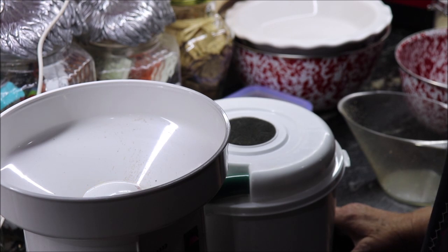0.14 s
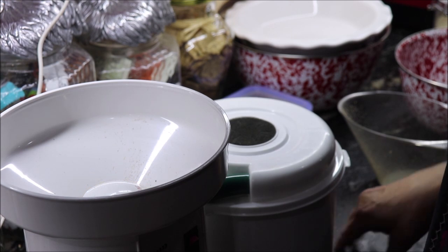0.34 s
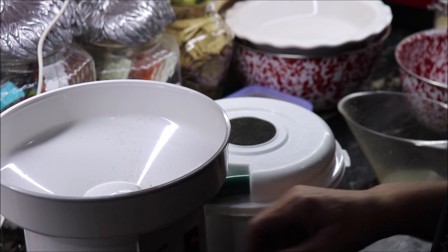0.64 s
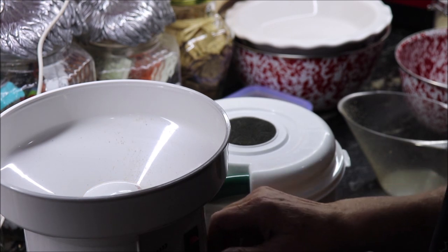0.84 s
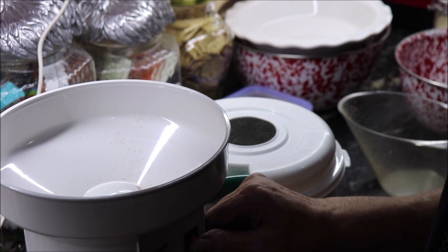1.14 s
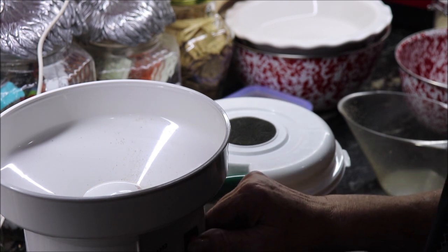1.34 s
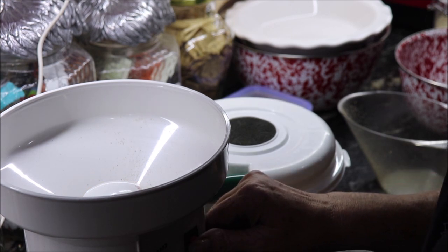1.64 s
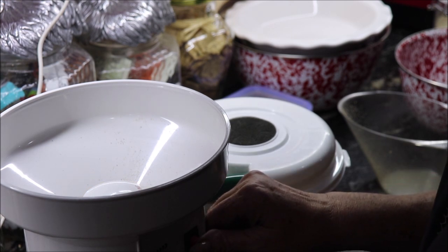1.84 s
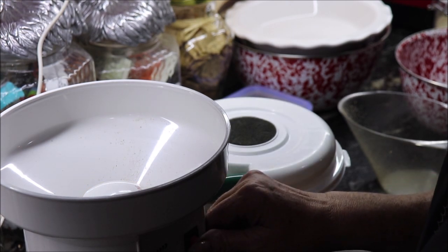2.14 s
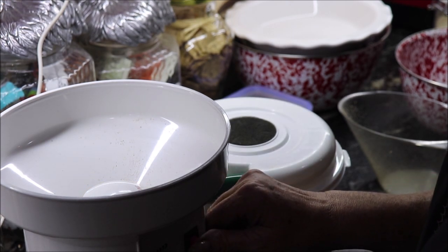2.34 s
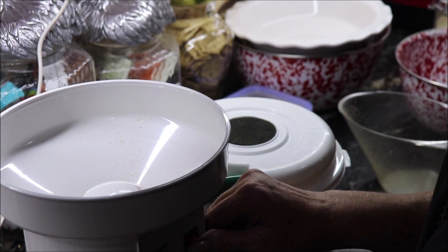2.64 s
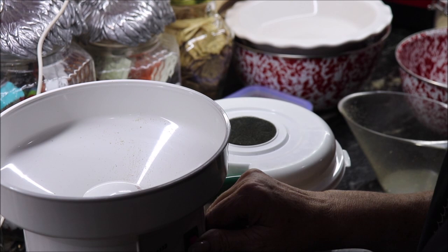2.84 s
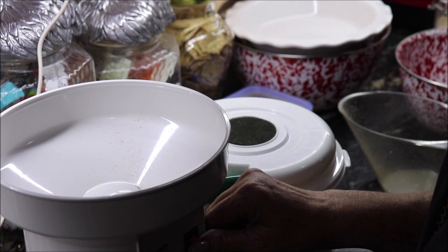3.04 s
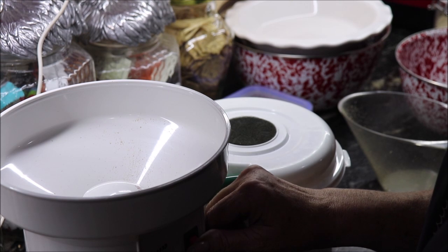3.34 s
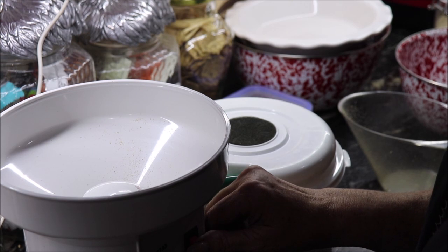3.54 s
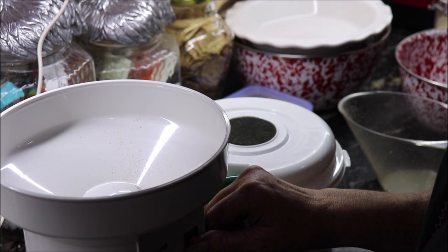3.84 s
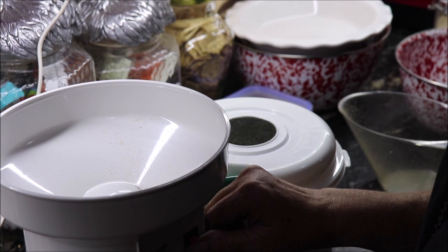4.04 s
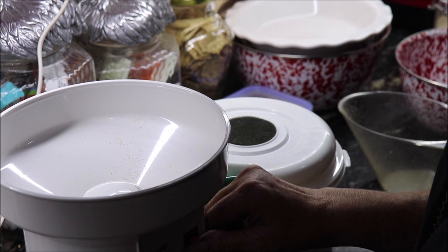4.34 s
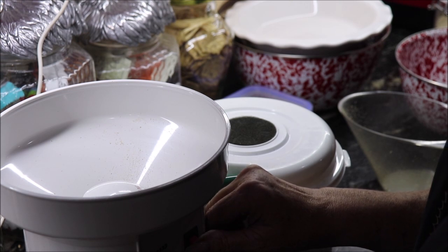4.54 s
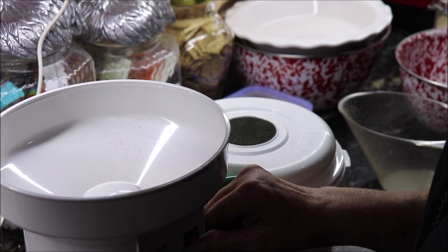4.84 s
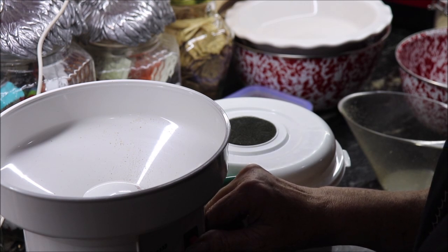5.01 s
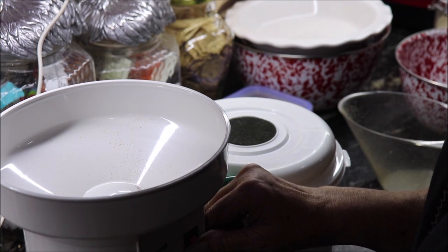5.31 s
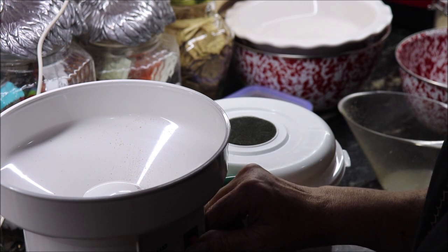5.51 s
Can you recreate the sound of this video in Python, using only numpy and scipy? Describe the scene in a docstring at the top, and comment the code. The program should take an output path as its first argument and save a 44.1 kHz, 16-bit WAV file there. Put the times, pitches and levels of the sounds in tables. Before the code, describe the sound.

An electric grain mill is already running at full noise, close to the microphone in a small kitchen with short reflections. In the first half second, dense gritty crunching and a low labouring rumble mix with ticking chips and brief bright sprays of kernels against plastic. At about 0.7 seconds a loud, dry plastic click with a quick rebound cuts through and the mill briefly ducks beneath it; one more short spray follows. The grain thins unevenly until about 2 seconds, while the motor's whine climbs quickly. Its drone, around 310 turns per second at first, rises to nearly 450, with high metallic whistles above it swelling, fading and fluttering on the way. From 2 to 5.5 seconds the tone is cleaner and shriller, rising ever more slowly over strong rushing air with slight leftover grit. A smaller, brighter click comes at 3.9 seconds. The mill never stops.

```python
"""A grain mill whines upward while its last grain rattles through; two sharp clicks stand out.
The motor speeds up as its load falls. Its shaft tones and the whistles of its tooth rings
swell and fade as they sweep across fixed resonances and dead spots.
Shaped noise makes the rushing air, the grinding and the flying chips."""
import sys
import numpy as np
from scipy import signal
from scipy.fft import rfft, irfft
from scipy.io import wavfile
from scipy.ndimage import uniform_filter1d

SR = 44100
rng = np.random.default_rng(int(sys.argv[2]) if len(sys.argv) > 2 else 0)


def dump(signal):
    """Clip the signal to [-1, 1] and save it as 16-bit WAV at the path in sys.argv[1]."""
    limited = np.clip(np.atleast_2d(signal).T, -1, 1)
    pcm = np.round(limited * 32767).astype(np.int16)
    wavfile.write(sys.argv[1], SR, pcm)


N = 250047
T = np.arange(N) / SR  # time [s]
HZ = np.fft.rfftfreq(N, 1 / SR)  # frequency of each spectrum bin

# deep tones of the shaft, before the resonances: (multiple of the rotor speed, level [dB])
SHAFT_ORDERS = [(1, -31.0), (2, -47.0), (3, -52), (5, -44)]
# whistles of the tooth rings, before resonances and echoes:
# (teeth, level running empty [dB], level under full load [dB])
RING_TEETH = [(9, -58.5, -43.5), (13, -48.5, -50), (21, -44, -43.5), (29, -44.5, -40.5), (33, -43.5, -32.5),
              (37, -43.2, -42.5)]
# bright, hissy colour of flying kernel chips: (frequency [Hz], relative level [dB])
CHIP_COLOUR = [(1500, -32), (5000, -8), (10000, -23), (12500, -3), (14000, -3), (15700, -8)]


def amp(db):
    """Turns decibels into a gain."""
    return 10 ** (np.asarray(db) / 20)


def unit(x):
    """Scales a signal to an average strength (rms) of 1."""
    return x / np.sqrt(np.mean(abs(x) ** 2) + 1e-20)


def curves(rows):
    """Joins each column of a table by straight lines in time."""
    times, *columns = np.transpose(rows)
    return [np.interp(T, times, column) for column in columns]


def spectrum(points, hz):
    """Reads the gain at each frequency from a table, on a log-frequency axis."""
    f, db = np.transpose(points)
    return amp(np.interp(np.log(hz + 1), np.log(f), db))


def wander(rate_hz):
    """Slow random motion of rms 1, up to about the given rate."""
    coarse = T[::32]  # slow motion needs few points
    hz = np.fft.rfftfreq(len(coarse), 32 / SR)
    noise = rng.standard_normal(len(coarse))
    slow = irfft(rfft(noise) / (1 + (hz / rate_hz) ** 2), len(coarse))
    return np.interp(T, coarse, unit(slow))


def add(mix, s, sound):
    """Mixes a sound in at time s."""
    part = mix[max(round(s * SR), 0):][:len(sound)]
    part += sound[:len(part)]


def bump(hz, centre, width):
    """One resonance curve: 1 at its centre, half of that at half its width to either side."""
    return 1 / (1 + (2 * (hz - centre) / width) ** 2)


def housing(hz, ring_db=0):
    """Gain of the plastic shell: resonances on a flat base, ring_db higher when shaken directly."""
    # resonances: (frequency [Hz], width [Hz], level against the flat base before ring_db [dB])
    shell_modes = [(562, 57, -12), (961, 106, -5), (1098, 206, -3.5), (1270, 49, -22), (1914, 59, -7),
                   (2092.5, 41, -3.5), (2340, 22, -9), (2672, 55, -5.5), (2850, 350, -2.5), (3787, 49, -1),
                   (4050, 120, 0), (5110, 530, -8.5), (6780, 120, -4), (7670, 150, 1.5), (8430, 130, 1)]
    return 1 + sum(amp(db + ring_db) * bump(hz, f, width) for f, width, db in shell_modes)


def standing_waves(modes, hz):
    """Gain that a tone meets at this frequency: a resonance lifts it, a dead spot swallows it."""
    return amp(sum(db * bump(hz, f, width) for f, width, db in modes))


def reflections(wet, t60):
    """Spectrum of the direct sound plus echoes off the counter, jars and walls; they die in t60 [s]."""
    t = T[:SR // 4]
    arrivals = rng.random(len(t)) < 2000 / SR  # about 2000 echoes per second
    echoes = rng.standard_normal(len(t)) * arrivals * amp(-60 * t / t60) * (t > .001)
    echo_spectrum = rfft(unit(echoes) / np.sqrt(len(t)), N)
    return (1 + wet * echo_spectrum) / np.sqrt(1 + wet ** 2)


def coloured(x, points, room):
    """Sends a raw sound through its own spectrum, the housing and the kitchen; rms 1."""
    return unit(irfft(rfft(x) * spectrum(points, HZ) * housing(HZ) * room, N))


def tone(turns, order, flutter=0, flutter_hz=30):
    """One multiple of the rotation, about rms 1; turbulence shakes its level and phase."""
    angle = 2 * np.pi * (order * turns + rng.random())
    in_phase = np.sqrt(2) + flutter * wander(flutter_hz)
    across = flutter * wander(flutter_hz)
    return (in_phase * np.cos(angle) + across * np.sin(angle)) / np.sqrt(1 + flutter ** 2)


def hum():
    """The mains current makes the motor windings hum, wavering in level."""
    # hum: (multiple of the mains frequency, level [dB])
    hum_tones = [(1, -73), (2, -62)]
    mains_hz = 60
    return sum(amp(db) * tone(mains_hz * T, k, flutter=0.75, flutter_hz=4.9) for k, db in hum_tones)


def air(speed, room):
    """Turbulent air driven through the mill grows with the rotor speed and flickers a little."""
    # colour of the air noise: (frequency [Hz], relative level [dB])
    air_colour = [(20, -31), (95, -31), (140, -17), (240, -11), (370, 1.5), (650, -2.5), (1100, 1.5),
                  (1600, -1.5), (2700, -7), (3200, -12.5), (6400, -17), (8300, -16), (10600, -23),
                  (12800, -17), (15700, -17.5)]
    final_db = -27.5  # average level at the final speed
    rush = coloured(rng.standard_normal(N), air_colour, room)
    speed_db = 29 * np.log10(speed / speed[-1])
    return rush * amp(final_db + speed_db + 0.63 * wander(rate_hz=15))


def chips(load, room):
    """Stray chips tick against the chamber wall at random, more often the fuller the mill."""
    full_load_per_s, tick_s, tick_db = 110, .002, -43  # rate, decay time [s], level at each tick's start
    hits = rng.random(N) < full_load_per_s * load ** 2 / SR
    # each hit starts a tick that dies away; the tiny offset keeps the filter off zero
    level = signal.lfilter([1], [1, -np.exp(-1 / (tick_s * SR))], hits + 1e-12)
    return amp(tick_db) * level * coloured(rng.standard_normal(N), CHIP_COLOUR, room)


def sprays(room):
    """Kernels spray against the chamber wall in brief bright showers of noise."""
    # showers: (start [s], level at the middle [dB], length [s])
    showers = [(0.028, -32, 0.027), (.093, -35, 0.005), (.108, -31, 0.007), (.254, -27, .012),
               (0.303, -34, .008), (.328, -32, .008), (.353, -31, .012), (.367, -41, .012),
               (0.46, -34, .016), (0.76, -29, .004), (0.843, -64, .008)]
    level = sum(amp(db) * np.exp(-2 * (2 * (T - s) / length - 1) ** 2) for s, db, length in showers)
    return level * coloured(rng.standard_normal(N), CHIP_COLOUR, room)


def clicks(snap_t60=0.0086, ring_t60=0.23, ring_db=-16, rebound=0.8, width_octaves=1.8):
    """Hard plastic snaps, rebounds once and rings very briefly, with little bass."""
    # clicks: (time [s], level before the bass cut [dB], brightest frequency [Hz], time to the rebound [s])
    click_rows = [(0.6714, -5, 3500, 0.0017), (3.9015, -17, 7660, 0.00046)]
    out, t = np.zeros(N), T[:4096]
    hz = np.fft.rfftfreq(len(t), 1 / SR)
    bass_cut = signal.butter(2, 1300, "highpass", fs=SR, output="sos")
    for s, db, bright_hz, gap in click_rows:
        first = amp(-60 * t / snap_t60)
        second = rebound * (t > gap) * amp(-60 * abs(t - gap) / snap_t60)
        ringing = amp(ring_db - 60 * t / ring_t60)
        octaves_away = np.log2((hz + 1) / bright_hz)
        colour = housing(hz) / (1 + (octaves_away / width_octaves) ** 4)
        noise = unit(irfft(rfft(rng.standard_normal(len(t))) * colour))
        snap = np.tanh(noise) * (first + second + ringing)  # tanh rounds off the peaks
        add(out, s, amp(db) * signal.sosfilt(bass_cut, snap))
    return out


def grinding(load, room):
    """Grain shatters on the teeth in a dense crackle of tiny impacts; the braked motor rumbles under them."""
    # colour of the shattering grain: (frequency [Hz], relative level [dB])
    grind_colour = [(30, -42), (110, -4), (230, -7.5), (500, -0.5), (1000, -2.5), (1400, 1), (2000, 2.5),
                    (3200, -6.5), (4600, -9), (6500, -18.5), (10000, -16), (13000, -12.5), (15700, -15)]
    # colour of the labouring motor: (frequency [Hz], relative level [dB])
    rumble_colour = [(30, -20), (65, -31), (105, -4), (170, -3.5), (230, 0.5), (400, 6.5), (1500, -60)]
    grind_db, rumble_db = -25, -46.5  # average levels at full load
    impacts = (rng.random(N) < 12000 * load / SR) * rng.standard_normal(N)  # 12000 per second at full load
    crunch = coloured(impacts, grind_colour, room) * np.sqrt(load.mean())
    rumble = amp(rumble_db) * load * coloured(rng.standard_normal(N), rumble_colour, room)
    return crunch * np.sqrt(load) * amp(grind_db + 0.65 * wander(rate_hz=24)) + rumble


def overtones(turns, speed, load):
    """Faint overtones and singing ball bearings light up as they sweep across the housing's resonances."""
    # outline of the overtones, before odd_db, housing and echoes:
    # (multiple of the rotor speed, level running empty [dB], level under full load [dB])
    outline = [(4, -48, -40.5), (6, -53.5, -41), (7.9, -59, -43), (12.3, -66, -55), (16, -58, -52.5),
               (19.1, -63, -62), (24, -49, -57), (28.04, -50.5, -61), (30, -53, -64), (34, -57, -51),
               (42, -58, -52)]
    # bearing tones between the overtones: (multiple of the rotor speed)
    bearing_orders = (1.43, 1.5, 2.59, 3.41, 4.41, 4.71, 5.41)
    # one for each bearing tone, before housing and echoes: (level running empty [dB])
    bearing_db = (-48, -58, -48.5, -46.5, -58, -55, -48.5)
    top_order, odd_db = 42, -6  # odd multiples are weaker than even ones
    bearing_loaded_db = -11  # a full chamber damps the bearing tones by this much
    shell, out = housing(HZ, ring_db=9.5), np.zeros(N)
    orders, empty, loaded = np.transpose(outline)
    strong = [row[0] for row in [*SHAFT_ORDERS, *RING_TEETH]]  # these have their own functions
    for k in range(1, top_order + 1):
        if k in strong:
            continue
        empty_db, loaded_db = np.interp(k, orders, empty), np.interp(k, orders, loaded)
        level_db = empty_db + (loaded_db - empty_db) * np.sqrt(load) + odd_db * (k % 2)
        level = amp(level_db) * np.interp(k * speed, HZ, shell)
        out += level * tone(turns, k, flutter=1.07 + 0.73 * load, flutter_hz=5.9)
    for k, db in zip(bearing_orders, bearing_db):
        level = amp(db + bearing_loaded_db * load) * np.interp(k * speed, HZ, shell)
        out += level * tone(turns, k, flutter=0.95, flutter_hz=10.4)
    return irfft(rfft(out) * reflections(wet=0.83, t60=0.13), N)


def rings(turns, speed, load):
    """Teeth pass teeth and whistle; flour makes them ragged, and echoes make them flicker as they glide."""
    # resonances (+) and dead spots (-) of the milling chamber and its hopper:
    # (frequency [Hz], width [Hz], level [dB])
    chamber_modes = [(3010, 1300, 14.0), (3740, 114, 7), (3887, 20, -11.6), (3902, 65, 5.4),
                     (4180, 224, 10.5), (5115, 57, 9.1), (5480, 27, 3), (5800, 74, 7), (8485, 150, 11.5),
                     (9240, 170, 6), (10220, 1200, -15.5), (12880, 416, 10.5), (13948, 100, 7),
                     (14300, 82, 7.7), (14333, 48, -14), (14650, 550, 8), (14658, 15, -12.5)]
    ragged, out = 0.15 + 0.49 * load, np.zeros(N)
    for teeth, empty_db, loaded_db in RING_TEETH:
        level = amp(empty_db + (loaded_db - empty_db) * np.sqrt(load))
        level = level * standing_waves(chamber_modes, teeth * speed)
        out += level * tone(turns, teeth, flutter=ragged, flutter_hz=29.8)
    return irfft(rfft(out) * reflections(wet=0.58, t60=0.078), N)


def shaft(turns, speed):
    """The rotor's unbalance shakes the whole mill: a clean drone and its rougher overtones."""
    # resonances (+) and dead spots (-) of the mill standing on the counter:
    # (frequency [Hz], width [Hz], level [dB])
    counter_modes = [(337.6, 13.5, -15), (348.4, 30, 10.5), (386.6, 5.6, -6.1), (409.7, 40, 8),
                     (451, 16.7, 6), (683, 40, 21), (813, 19, 12.5), (849, 28, 10.9), (910, 47.5, 17),
                     (1001, 39, 16), (1135, 117, 25), (1308.7, 77, 16), (1894, 164, 13), (2090, 54, 2.5)]
    out = np.zeros(N)
    for k, db in SHAFT_ORDERS:
        level = amp(db) * standing_waves(counter_modes, k * speed)
        out += level * tone(turns, k, flutter=0.094 * k, flutter_hz=18)
    return out


def scene():
    """Adds up the sounds of the mill, alike in both channels."""
    # rotor speed before its small random wobble: (time [s], speed [turns per second])
    speed_rows = [(0.0, 312.0), (0.15, 317.7), (0.28, 330.8), (0.73, 350.9), (1.05, 369.8), (1.31, 383.2),
                  (1.74, 396.4), (1.81, 396.6), (2.12, 407.2), (2.66, 421.4), (3.12, 429.6), (3.3, 432.5),
                  (3.75, 434.9), (4.26, 438.7), (4.44, 441.3), (4.56, 440.7), (4.91, 441.9), (5.67, 447.9)]
    # grain left in the milling chamber: (time [s], load [0-1])
    load_rows = [(0, 0.98), (.15, 0.77), (.35, 0.82), (.5, 0.66), (.65, 0.31), (.9, 0.47), (1.1, 0.26),
                 (1.45, 0.4), (1.8, 0.12), (2.1, 0.06), (3, 0.18), (5.67, 0.01)]
    speed, load = curves(speed_rows)[0], np.clip(curves(load_rows)[0], 0, 1)
    # the speed wobbles at random, more so under load, as kernels brake the rotor
    wobble = (0.15 + 0.57 * load) * wander(rate_hz=13.7)
    turns = np.cumsum(speed + wobble) / SR
    room = reflections(wet=0.26, t60=0.21)
    whine = hum() + overtones(turns, speed, load) + rings(turns, speed, load) + shaft(turns, speed)
    grain = chips(load, room) + sprays(room) + grinding(load, room)
    mill = air(speed, room) + grain + clicks() + whine
    return np.array([mill, mill])


def record(dry, threshold_db=-18, recovery_db_per_s=50):
    """A limiter ducks loud moments and recovers steadily; then a filter removes the highest treble."""
    edge_hz, attack_s = 15780, 0.0011
    power_db = 10 * np.log10(abs(uniform_filter1d(dry[0] ** 2, size=160)) + 1e-12)
    # hold each peak, letting it sink at the recovery rate
    fall = T * recovery_db_per_s
    held_db = np.maximum.accumulate(power_db + fall) - fall
    over_db = np.maximum(held_db - threshold_db, 0)
    attack = np.exp(-1 / (attack_s * SR))
    ducked = dry * amp(-signal.lfilter([1 - attack], [1, -attack], over_db))
    low_pass = signal.firwin(801, edge_hz, window=("kaiser", 9), fs=SR)
    return signal.oaconvolve(ducked, low_pass[None], "same")


dry = scene()
out = record(dry)
dump(out)
```